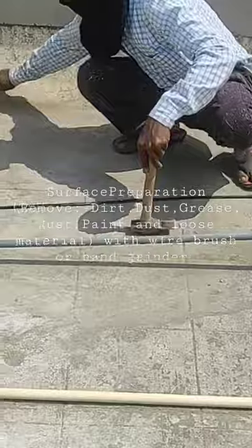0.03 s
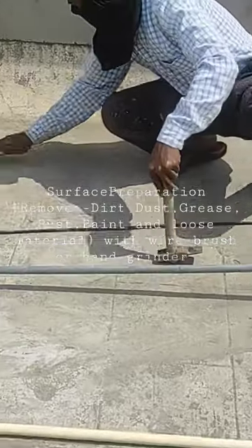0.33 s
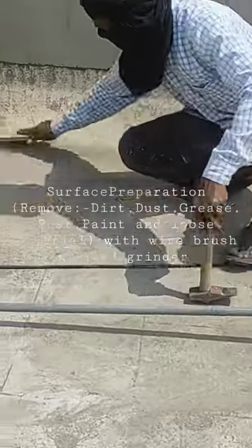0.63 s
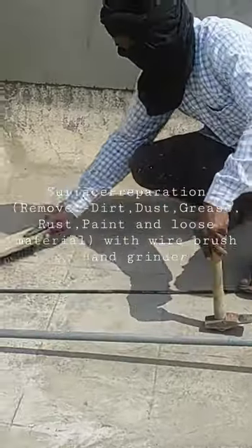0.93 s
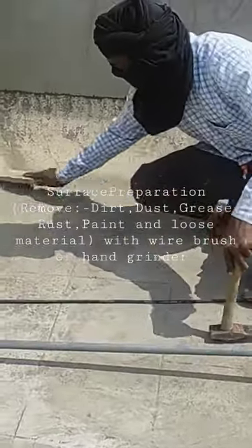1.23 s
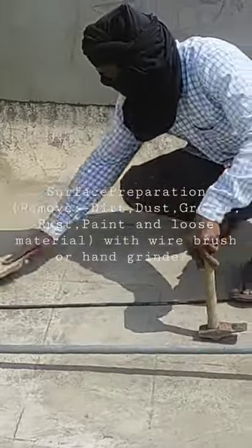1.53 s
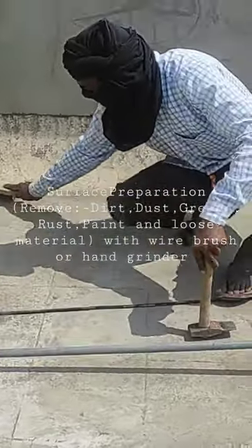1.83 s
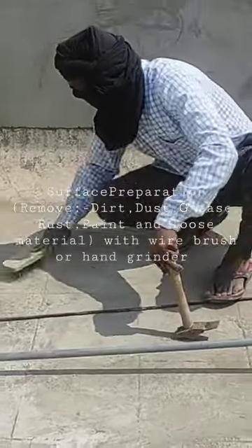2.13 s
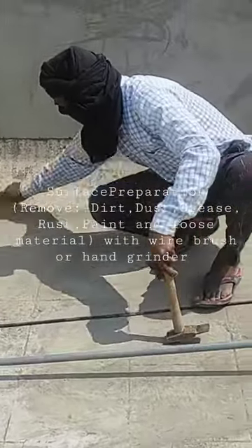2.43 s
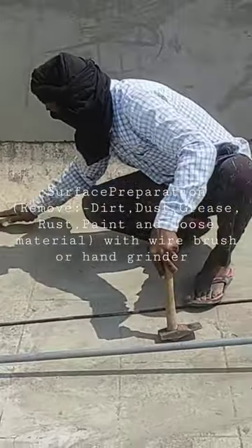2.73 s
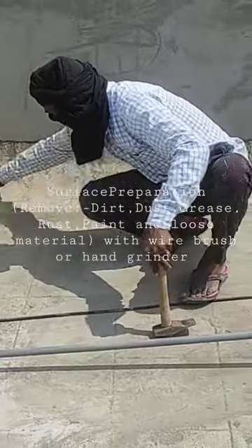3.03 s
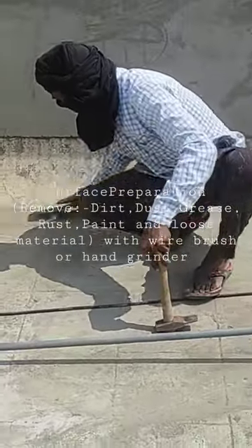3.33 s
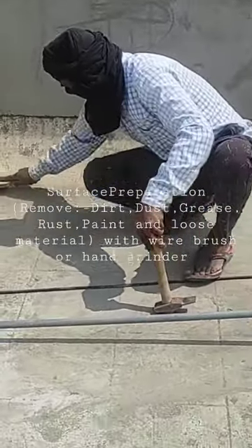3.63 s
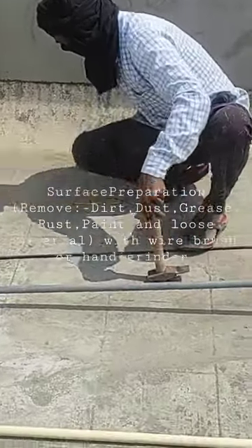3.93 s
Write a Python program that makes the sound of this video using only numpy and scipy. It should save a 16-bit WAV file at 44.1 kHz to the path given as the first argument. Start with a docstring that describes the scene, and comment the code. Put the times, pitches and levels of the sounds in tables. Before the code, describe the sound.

A wire brush scrubbing concrete in rasping strokes over a low outdoor rumble.

```python
"""A hand wire brush scrubs back and forth on a concrete roof. Its steel bristles catch and flick free,
ringing near 7 kHz, while grit rasps under the wooden back. Near the start come two short scuffs,
with knocks of the wood on the concrete. An engine thrums some way off, under a low outdoor rumble
of wind and town with faint microphone hiss on top. The sound fades in just after the start."""
import sys
import numpy as np
from scipy import signal
from scipy.fft import rfft, irfft, next_fast_len
from scipy.io import wavfile
from scipy.ndimage import uniform_filter1d, map_coordinates

SR = 44100
rng = np.random.default_rng(int(sys.argv[2]) if len(sys.argv) > 2 else 0)


def wav_record(signal):
    """Record a signal, one row per channel, as 16-bit PCM in the file named by sys.argv[1]."""
    frames = np.transpose(np.atleast_2d(signal))
    bounded = np.clip(frames, -1, 1)
    # unit amplitude maps onto the largest positive 16-bit level
    quanta = np.round(bounded * 32767).astype(np.int16)
    wavfile.write(sys.argv[1], SR, quanta)


N = 176400  # 4 seconds

# The engine's tones, as multiples of its cycle rate: multiple, level_db
ENGINE_TONES = [(1, -48.5), (4, -41.5), (8, -68), (10, -46), (12, -38), (16, -45)]
# How the deep thrum (multiple 4) rises and falls: time_s, relative_db
THRUM_SWELLS = [(0.2, -37.5), (0.34, -75), (0.59, -34), (0.62, -42), (1.01, -33.5), (1.45, -49),
                (1.63, -36), (1.95, -36), (2.4, -46), (2.43, -41.5), (2.86, -35), (3.34, -45.5),
                (3.68, -34.5), (4.0, -42)]
# How the higher drone (multiple 12) rises and falls: time_s, relative_db
DRONE_SWELLS = [(0.3, -36.5), (0.35, -30.5), (0.44, -41.5), (0.57, -32), (0.82, -63), (0.89, -38.5),
                (1.43, -44), (1.45, -38), (3.26, -34), (3.28, -43), (3.39, -34.5), (4.0, -36)]
# The faint machine whine: pitch_hz, level_db
WHINE_TONES = [(379, -53.5), (426, -51), (615, -57.5), (852, -55)]
# Low rumble of wind and town, with faint microphone hiss on top: frequency_hz, gain_db
RUMBLE_COLOUR = [(12, -0.5), (30, -10), (47, -2.5), (70, -1), (110, -3.5), (170, 3.5), (220, 3),
                 (300, -0.5), (400, -4.5), (550, -6.5), (700, -6), (850, -4), (1050, -11), (1500, -14),
                 (2100, -18), (2800, -22), (4500, -29), (9000, -34), (11000, -58), (15000, -58)]
# How alike left and right are for rumble and scuffs (1 = the same): frequency_hz, likeness
OUTDOOR_LIKENESS = [(100, 1), (300, 0.65), (700, 0.87), (1500, 0.31), (5000, 0.075)]
# How much louder rumble and scuffs are on the left: frequency_hz, left_over_right_db
OUTDOOR_BALANCE = [(60, 12.5), (200, 6.7), (400, 7.3), (750, 6.5), (1400, 2.5), (2000, 5.3), (2600, 2),
                   (8000, 2.7)]
# How far the wave at the left microphone is ahead of the right: frequency_hz, lead_radians
LEFT_LEAD = [(150, 0), (500, 0.74), (950, 1.52), (1600, 3.5), (4900, 3.5), (5600, 2.1), (6400, 0),
             (8700, -0.1), (10200, -3)]
# Brush strokes: start_s, swell_s, fade_s, relative_db, rise_db, fall_db, grit_db, rasp_db, pitch_ratio
BRUSH_STROKES = [(.165, 0.056, 0.069, -38.5, -17, -7, -0.5, -2.5, 1.01),
                 (.322, 0.14, 0.143, -30.5, 16, 3, -4, 2.5, 0.97),
                 (.63, 0.16, 0.05, -27, 12, 1, -2, -2.5, 0.99),
                 (.912, 0.15, 0.095, -25, 10.5, 14, 0.5, -4, 1.025),
                 (1.165, 0.15, 0.12, -29.5, 9.5, 7, -2.5, -0.5, 1.006),
                 (1.47, 0.15, 0.11, -27, 6.5, 16, 0, -1, 0.98),
                 (1.745, 0.083, 0.18, -31, 12.5, 2, -1, 1, 1.005),
                 (2.02, 0.18, 0.17, -29, 5, 27, -2.5, -2, 0.99),
                 (2.28, 0.35, 0.125, -30.5, 12, 13, -1, -1.5, 0.98),
                 (2.745, 0.081, 0.28, -31, 18, 27, -1, 0, 0.97),
                 (3.035, 0.073, 0.1, -31, 7, 5, -0.5, -4.5, 0.99),
                 (3.258, 0.054, 0.25, -33, -4.5, 12.5, -2, 1, 0.98),
                 (3.59, 0.08, 0.17, -34.8, 13, 6, -0.5, 1.5, 0.98),
                 (3.875, 0.089, 0.13, -35, 17.5, 14.5, -0.5, 2.5, 0.97)]
# The ring of the steel bristles: frequency_hz, gain_db
BRISTLE_COLOUR = [(3000, -27), (5200, -20), (6200, -7.5), (6900, 0.5), (7250, 2.5), (7600, 2.5),
                  (8100, -5.5), (9100, -10.5), (10500, -29), (15500, -30)]
# The broader rasp of bristles pressed hard: frequency_hz, gain_db
RASP_COLOUR = [(2000, -23.5), (3800, -11), (4700, -12), (5600, -6), (6400, 0), (7500, 3), (8300, -4),
               (9200, -5), (10200, -11.5), (11500, -13.5), (13200, -11.5), (15500, -19)]
# Grit grinding on concrete: frequency_hz, gain_db
GRIT_COLOUR = [(150, -18), (400, -4), (800, -6.5), (1300, -2.5), (2000, -0.5), (2700, -0.5), (4000, -2),
               (6000, -0.5), (10000, -8.5), (15000, -49)]
# The wooden back, shaken by the grit: frequency_hz, gain_db
WOOD_COLOUR = [(60, -4), (150, 14), (400, -17), (800, -33), (1150, -0.5), (1400, 2), (1750, -1.5),
               (2100, -2.5), (2600, -20), (4300, -11), (6000, -28), (12000, -47)]
# How alike left and right are for the brush: frequency_hz, likeness
BRUSH_LIKENESS = [(1000, .5), (3000, 0), (4700, 0.5), (5400, 0.3), (6500, 0.53), (8200, 0.28),
                  (13000, 0.17)]
# How much louder the brush is on the left: frequency_hz, left_over_right_db
BRUSH_BALANCE = [(1000, 1.5), (2000, 5.5), (2700, -0.5), (4600, -0.5), (5200, 6.5), (6200, 1.5), (7300, -5),
                 (8300, -1.5), (9400, 0), (14000, -0.5)]
# Short scrapes on the concrete: start_s, length_s, level_db
SCUFF_TIMES = [(.248, 0.0336, -28), (0.298, 0.043, -30)]
# The dull tone colour of a scuff: frequency_hz, gain_db
SCUFF_COLOUR = [(80, -6), (250, -1), (550, 4.5), (800, 1), (1200, -0.5), (2200, -12), (4000, -22),
                (12000, -37)]
# The wooden back hits the concrete: start_s, level_db
KNOCK_TIMES = [(.255, -31), (.297, -27), (.318, -26)]
# The tones of the knocked wood (ring_s is the time to fall 60 dB): pitch_hz, relative_db, ring_s
KNOCK_TONES = [(169, -3, .04), (576, -1.5, 0.032), (1020, -3, 0.031), (1300, -12, .02), (1760, -11, .02)]

TIME_S = np.arange(N) / SR
SIDES = np.array([[.5], [-.5]])  # splits a difference: half up on the left, half down on the right


def amp(db):
    """Turn decibels into a gain to multiply by."""
    return 10 ** (np.asarray(db) / 20)


def unit(x):
    """Scale a signal so that its average strength (rms) is 1."""
    return x / np.sqrt(np.mean(x ** 2) + 1e-20)


def along(points, hz):
    """Read between the rows of a frequency table, on a musical (log) scale."""
    frequencies, values = np.transpose(points)
    return np.interp(np.log(hz + 1), np.log(frequencies + 1), values)


def wobble(per_s):
    """A smooth curve through per_s random values each second."""
    return map_coordinates(rng.standard_normal(int(N * per_s / SR) + 4), [np.arange(N) * per_s / SR])


def filtered(x, response):
    """Multiply each frequency in x by response(hz)."""
    size = next_fast_len(N + SR // 4)
    return irfft(rfft(x, size) * response(np.fft.rfftfreq(size, 1 / SR)), size)[..., :N]


def resonate(pair, colour, size=2048):
    """Pass two signals through an object that rings with this tone colour."""
    cepstrum = irfft(np.log(amp(along(colour, np.fft.rfftfreq(size, 1 / SR)))))
    fold = np.r_[1, np.full(size // 2 - 1, 2), np.zeros(size // 2)]  # ring after a tap, never before
    tap_sound = irfft(np.exp(rfft(cepstrum * fold)))
    return signal.fftconvolve(pair, tap_sound[None], axes=1)[:, :N]


def place(pair, likeness, balance):
    """Blend two unrelated signals into left and right, at an overall strength of 1."""
    angle = lambda hz: np.arccos(np.clip(along(likeness, hz), -1, 1)) / 2
    mid, side = filtered(pair, lambda hz: np.array([np.cos(angle(hz)), np.sin(angle(hz))]))
    lean = lambda hz: amp(SIDES * along(balance, hz)) * np.exp(1j * SIDES * along(LEFT_LEAD, hz))
    return unit(filtered(np.array([mid + side, mid - side]), lean))


def patchy(pair, depth_db, bands, frames):
    """Make random patches of time and frequency louder or softer."""
    spectra = signal.stft(pair, nperseg=512)[2]
    patches = uniform_filter1d(rng.standard_normal(spectra.shape[1:]), bands, axis=0)
    patches = uniform_filter1d(patches, frames, axis=1)
    return signal.istft(spectra * amp(depth_db * unit(patches)), nperseg=512)[1][:, :N]


def engine(cycle_hz=15.53, speed_drift=0.00401, waver_db=0.5, left_db=3.5):
    """A distant engine hums at multiples of its cycle rate. Each tone wavers; a faint whine sits above."""
    engine_time = np.cumsum(1 + speed_drift * wobble(3.048)) / SR
    swell = lambda time_s, db: np.interp(TIME_S, time_s, db - np.median(db))
    swells_db = {4: swell(*np.transpose(THRUM_SWELLS)), 12: swell(*np.transpose(DRONE_SWELLS))}
    tone = lambda hz, db: np.sqrt(2) * amp(db) * np.sin(2 * np.pi * (hz * engine_time + rng.random()))
    hum = sum(tone(multiple * cycle_hz, db + swells_db.get(multiple, waver_db * wobble(6.06)))
              for multiple, db in ENGINE_TONES)
    whine = sum(tone(hz, db + waver_db * wobble(5.75)) for hz, db in WHINE_TONES)
    return (hum + whine) * amp(left_db * SIDES)


def rumble(level_db=-33):
    """Low noise of wind and town, with faint microphone hiss on top, shifting in gentle patches."""
    noise = patchy(rng.standard_normal((2, N)), depth_db=1.15, bands=5, frames=14)
    low_noise = filtered(noise, lambda hz: amp(along(RUMBLE_COLOUR, hz)))
    return amp(level_db) * place(low_noise, OUTDOOR_LIKENESS, OUTDOOR_BALANCE)


def friction(per_s, spread_db, click_share):
    """Rubbing makes tiny clicks of uneven size as things catch, over a smooth sliding hiss."""
    sizes = (rng.random(N) < per_s / SR) * amp(spread_db * np.minimum(rng.exponential(size=N), 5))
    clicks = unit(sizes * rng.choice([-1, 1], (2, N)))
    return np.sqrt(click_share) * clicks + np.sqrt(1 - click_share) * rng.standard_normal((2, N))


def stroke_force(bite_s=0.026, release_s=0.041, drag_db=-47.5):
    """Each stroke bites, swells and lets go. The bristles still drag lightly at the turns."""
    force = np.full(N, amp(drag_db))
    for start, swell_s, fade_s, db, rise_db, fall_db, *_ in BRUSH_STROKES:
        crest = start + swell_s
        end = crest + fade_s
        contact = np.clip((TIME_S - start) / bite_s, 0, 1) * np.clip((end - TIME_S) / release_s, 0, 1)
        before_db = rise_db * np.clip((crest - TIME_S) / swell_s, 0, 1) ** 1.48
        after_db = fall_db * np.clip((TIME_S - crest) / fade_s, 0, 1) ** 1.32
        force = np.hypot(force, contact * amp(db - before_db - after_db))
    return force


def bristles(colour, pitch_ratio, ring_s=0.029, tail_db=-4, waver=0.012, block=1470):
    """Steel wires catch and flick free, ringing the tuft. Single wires ring on briefly."""
    catches = friction(per_s=3500, spread_db=-0.5, click_share=0.72)
    speed = pitch_ratio + waver * wobble(22)
    t = np.arange(SR // 20) / SR
    tails = np.zeros((2, N + len(t) + block))
    for i in range(0, N, block):  # other wires ring in each short block
        wire = rng.standard_normal((2, len(t))) * amp(-60 * t / ring_s)
        tail = signal.fftconvolve(catches[:, i:i + block], wire / np.linalg.norm(wire[0]), axes=1)
        tails[:, i:i + tail.shape[1]] += tail
    tuft = resonate(catches + amp(tail_db) * tails[:, :N], colour)
    position = np.cumsum(speed)  # reading faster or slower bends the pitch
    return unit(np.array([map_coordinates(side, [position], order=5, mode="mirror") for side in tuft]))


def flicker(per_s=70, jump_db=2, decay_s=0.0069, flutter_db=0.88):
    """Small random jumps in loudness that die away quickly, with a slight flutter."""
    t = np.arange(SR // 10) / SR
    jumps = (rng.random(N) < per_s / SR) * rng.uniform(.3, 1, N)
    db = jump_db * signal.fftconvolve(jumps, np.exp(-t / decay_s))[:N]
    return amp(db - db.mean() + flutter_db * wobble(60))


def brush(ring_db=-36, rasp_db=-36, wood_db=-46, grit_db=-40.5, bend_per_db=-0.001):
    """Bristles ring and grit grinds. Pressing harder lowers the ring and brings out rasp and wood."""
    starts, swells, _, levels, _, _, extra_grit_db, extra_rasp_db, ratios = np.transpose(BRUSH_STROKES)
    force = stroke_force() / amp(levels.mean())  # 1 at a typical stroke
    by_stroke = lambda column: np.interp(TIME_S, starts + swells, column)
    pitch_ratio = by_stroke(ratios) + bend_per_db * 20 * np.log10(force)
    grains = lambda: friction(per_s=1500, spread_db=3.5, click_share=0.24)
    # Patchy, because different wires take the load from moment to moment.
    spread = lambda pair: place(patchy(pair, 1.9, bands=3, frames=7), BRUSH_LIKENESS, BRUSH_BALANCE)
    ringing = spread(bristles(BRISTLE_COLOUR, pitch_ratio))
    rasp = spread(bristles(RASP_COLOUR, pitch_ratio))
    grit = spread(resonate(grains(), GRIT_COLOUR))
    wood = spread(resonate(grains(), WOOD_COLOUR))
    # The higher the power on force, the faster that layer grows with pressure.
    return flicker() * (amp(ring_db) * force ** 0.99 * ringing
                        + amp(rasp_db + by_stroke(extra_rasp_db)) * force ** 1.13 * rasp
                        + amp(wood_db) * force ** 1.5 * wood
                        + amp(grit_db + by_stroke(extra_grit_db)) * force ** 0.61 * grit)


def scuffs(attack_s=0.002, release_s=0.011):
    """Short bursts of rubbing make dull scrapes on the concrete."""
    loudness = np.zeros(N)
    for start, length_s, db in SCUFF_TIMES:
        rise = np.clip((TIME_S - start) / attack_s, 0, 1)
        fall = np.clip((start + length_s - TIME_S) / release_s, 0, 1)
        loudness += amp(db) * rise * fall
    scrape = resonate(friction(per_s=460, spread_db=2, click_share=0.51), SCUFF_COLOUR)
    return loudness * place(scrape, OUTDOOR_LIKENESS, OUTDOOR_BALANCE)


def knocks(attack_s=0.00067, left_db=7):
    """The wooden back hits the concrete and rings with a few short, dull tones."""
    t = np.arange(SR // 10) / SR
    out = np.zeros(N)
    for start, db in KNOCK_TIMES:
        tones = sum(amp(tone_db + rng.normal(0, 1.5) - 60 * t / ring_s) * np.sin(2 * np.pi * hz * t)
                    for hz, tone_db, ring_s in KNOCK_TONES)
        out[round(start * SR):][:len(t)] += amp(db) * (1 - np.exp(-t / attack_s)) * tones
    return out * amp(left_db * SIDES)


def scene():
    """The brush close by, over the outdoor background."""
    return brush() + knocks() + scuffs() + engine() + rumble()


def record(dry, silent_s=0.16, fade_s=0.19, top_hz=15520):
    """Fade in after a moment of silence and cut off the highest treble."""
    fade = np.clip((TIME_S - silent_s) / fade_s, 0, 1) ** 0.81
    return filtered(dry * fade, lambda hz: hz < top_hz)


dry = scene()
out = record(dry)
wav_record(out)
```